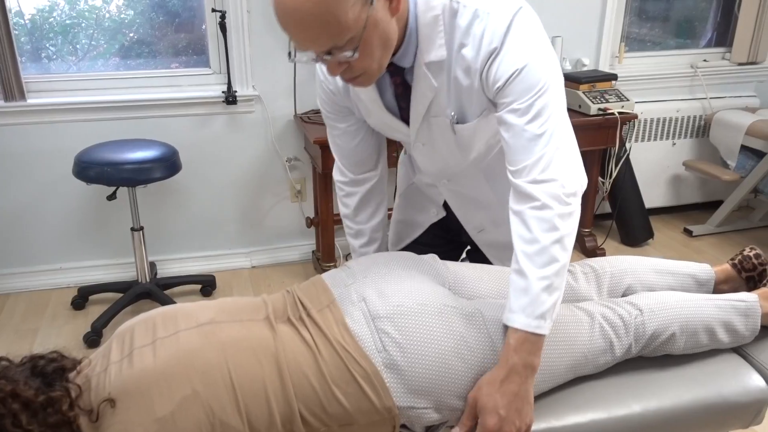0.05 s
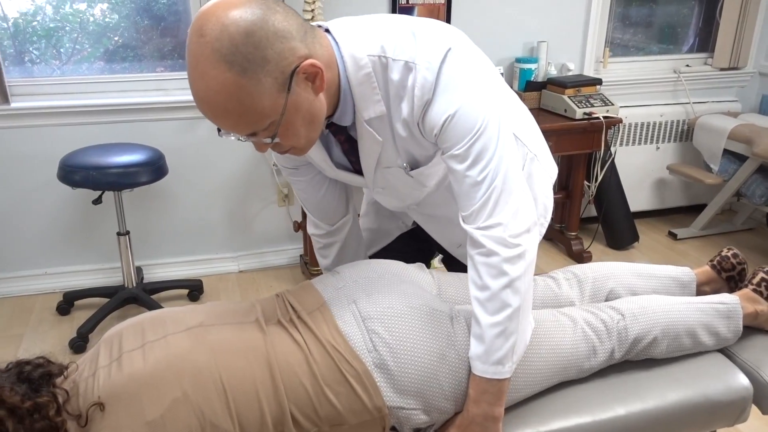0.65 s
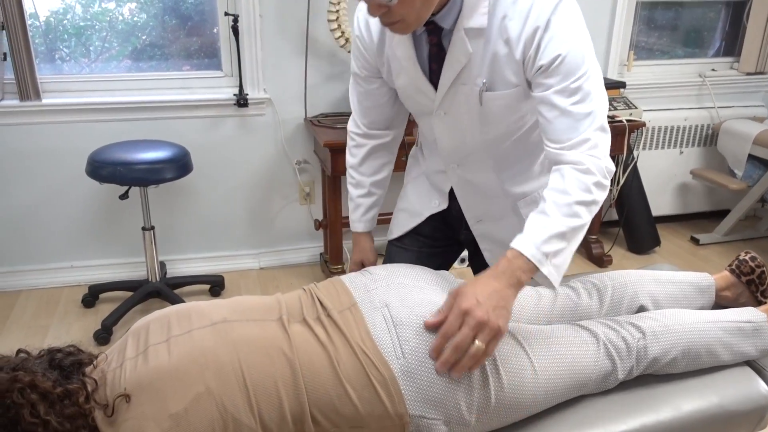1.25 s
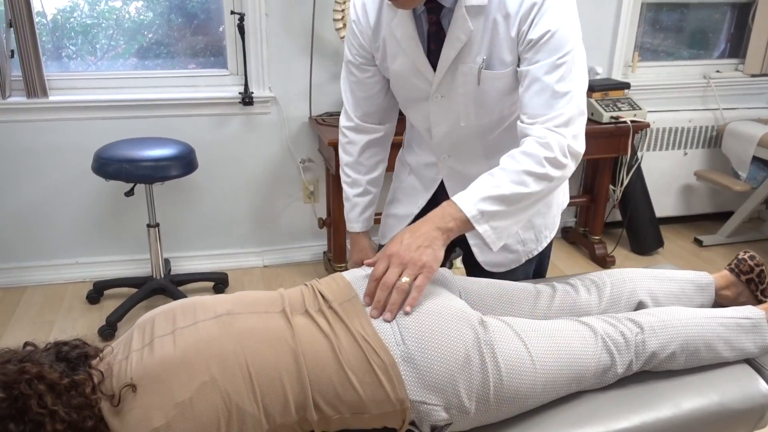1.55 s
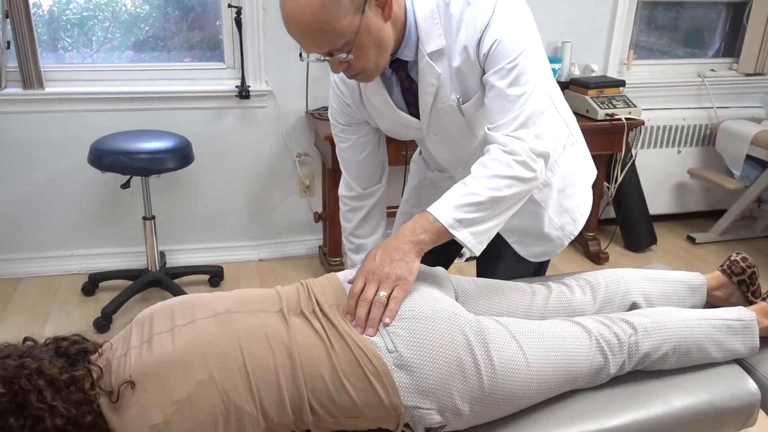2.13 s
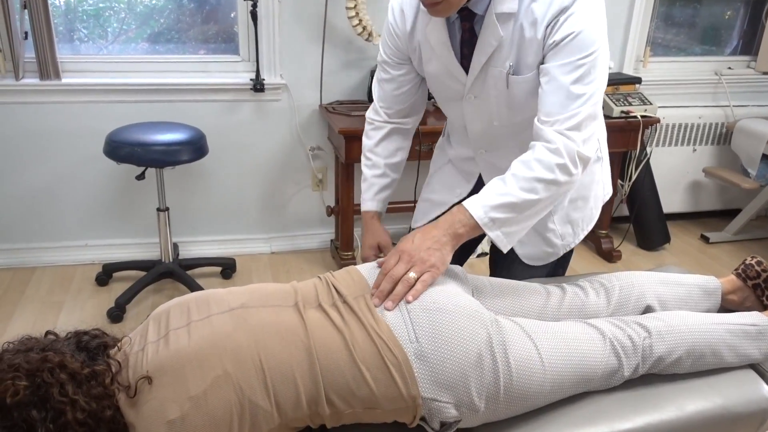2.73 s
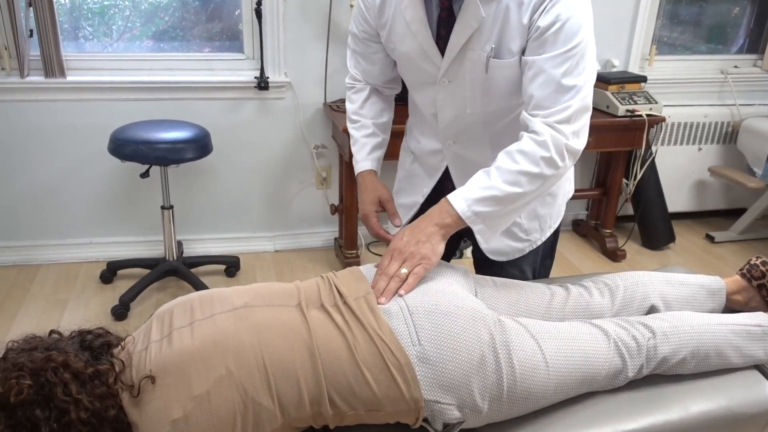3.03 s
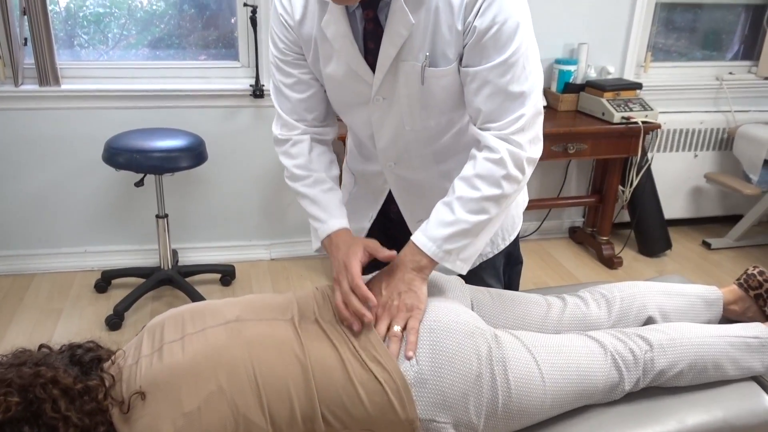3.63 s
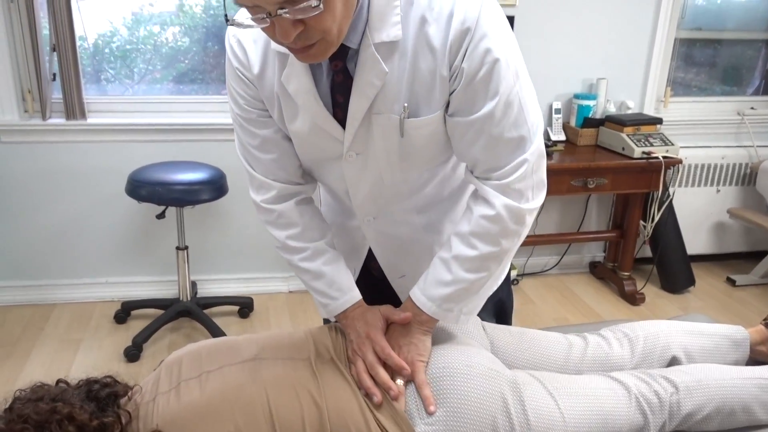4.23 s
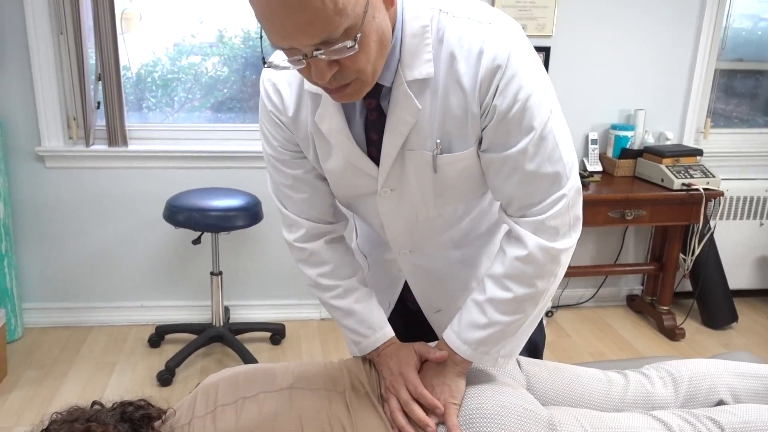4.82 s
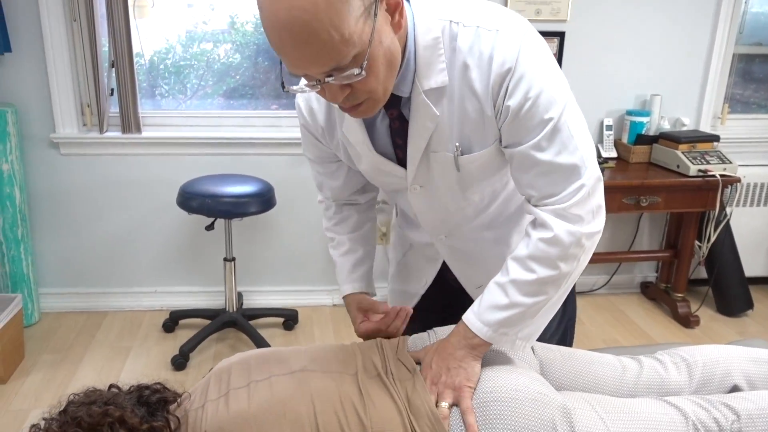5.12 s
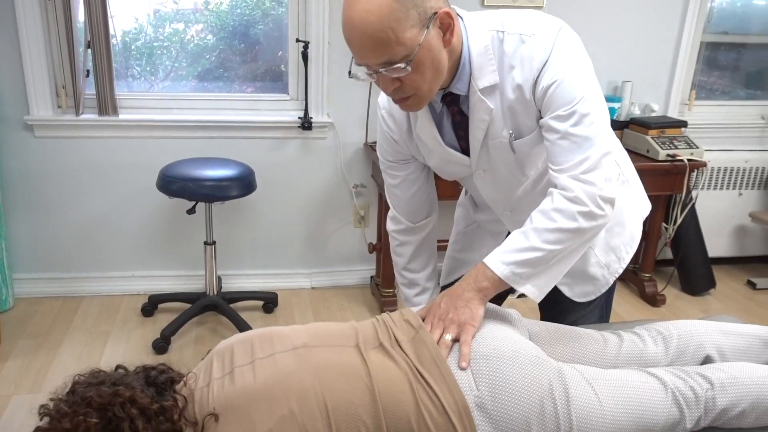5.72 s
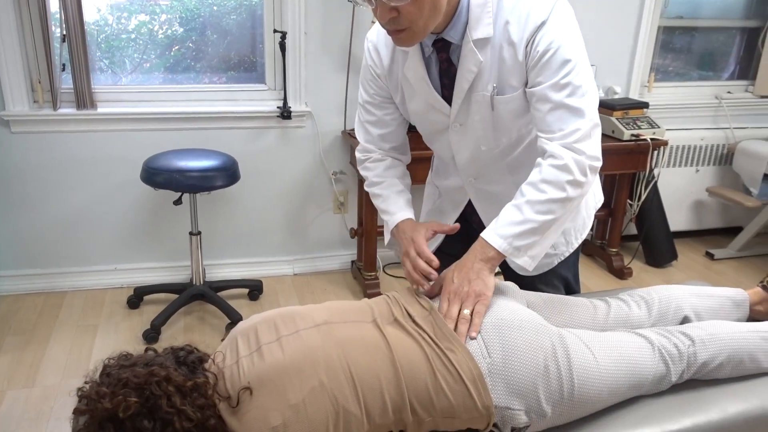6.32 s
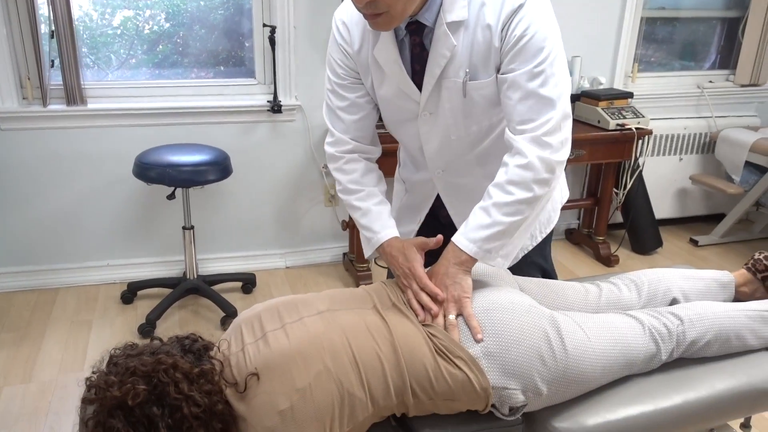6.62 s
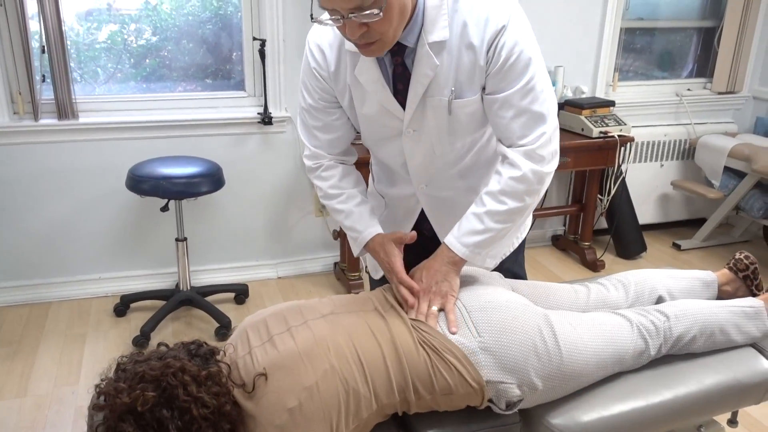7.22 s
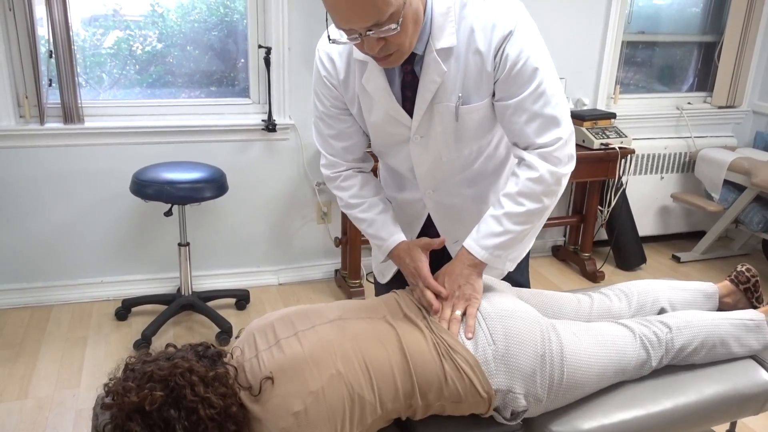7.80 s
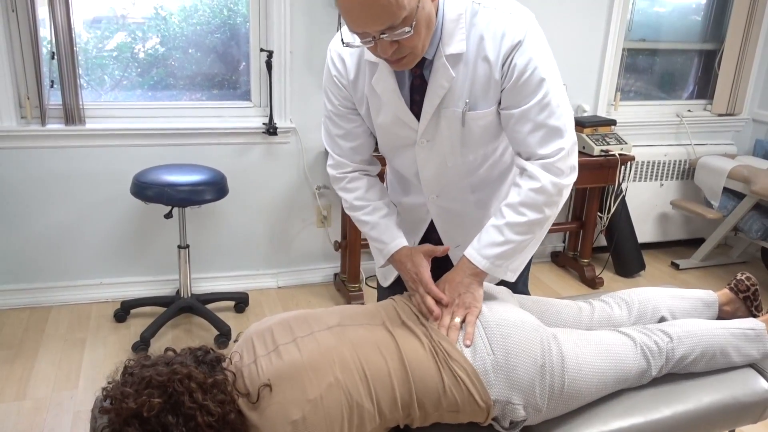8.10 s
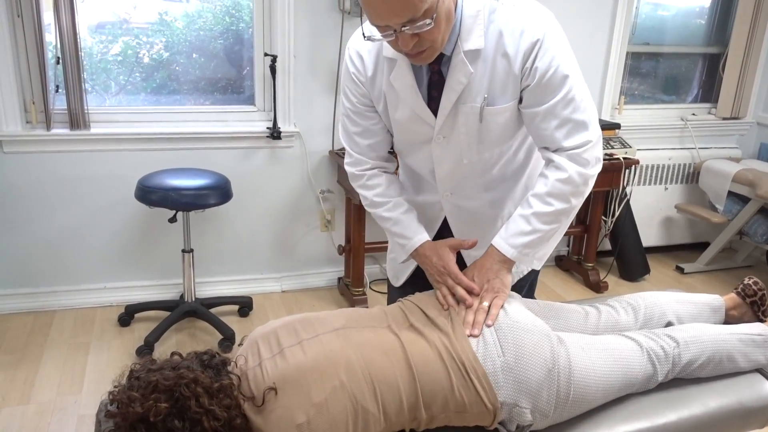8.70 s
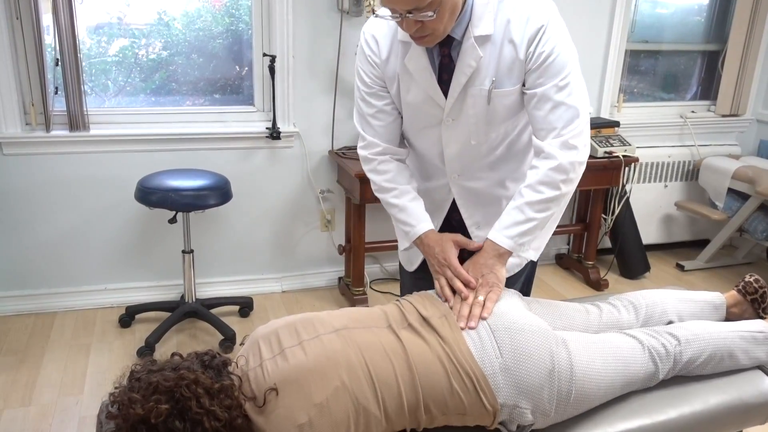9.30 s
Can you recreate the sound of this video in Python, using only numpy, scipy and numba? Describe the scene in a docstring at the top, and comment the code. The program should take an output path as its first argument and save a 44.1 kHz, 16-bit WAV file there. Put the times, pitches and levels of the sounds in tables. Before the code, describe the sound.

Faint ventilation hums throughout in a small, hard-walled room, with soft rustling of hands and sleeves on clothes. A padded treatment table creaks at 0.4 seconds, and its steel latches clank at about 0.7, 1.0 and 1.5 seconds. A motor whines quietly from 1.6 to 2.3 seconds, ending with a sharp knock and a short, high squeak. From 2.8 to 3.3 seconds a section is ratcheted up in six quickening, fading clicks. At 4.6 seconds it is thrust down with a loud, rattling clunk. The frame knocks around 5.7 seconds, a second ratchet run follows from 6.0 to 6.5, and another heavy drop lands at 6.9. After that, only faint cloth rubbing and the hum remain until the end, past 9 seconds. The blows sound slightly distant and flattened, with short room reflections.

```python
"""A small, hard-walled room where a padded treatment table is worked. Steel latches clank, a geared
motor runs briefly, dry joints creak and squeak as they stick and slip. Twice the drop section is
ratcheted up, then thrust down onto its stop. Clothes rustle over a low ventilation hum.
The microphones hear mostly reflections, and a limiter flattens every loud blow."""
import sys
import numpy as np
from scipy import signal
from scipy.fft import rfft, irfft
from scipy.io import wavfile
from scipy.ndimage import uniform_filter1d
from numba import njit

SR = 44100
rng = np.random.default_rng(int(sys.argv[2]) if len(sys.argv) > 2 else 0)


def to_wav(s):
    """Save 16-bit WAV."""
    ch = np.atleast_2d(s).T  # columns
    pcm = np.round(np.clip(ch, -1, 1) * 32767)  # PCM
    wavfile.write(sys.argv[1], SR, pcm.astype(np.int16))


N = 412335
T = np.arange(N) / SR
BLOW_T = T[:SR // 2]


def amp(db):
    """Decibels to gain."""
    return 10 ** (np.asarray(db) / 20)


def unit(x):
    """Scale to rms 1."""
    return x / np.sqrt(np.mean(x ** 2))


def along(points, hz):
    """Read (Hz, value) points on a log-frequency axis."""
    knots_hz, values = np.transpose(points)
    return np.interp(np.log(hz + 1), np.log(knots_hz), values)


def colour(x, points):
    """Filter by a (Hz, dB) spectrum."""
    return irfft(rfft(x) * amp(along(points, np.fft.rfftfreq(len(x), 1 / SR))), len(x))


def noise(size):
    """Flat-spectrum noise, rms 1."""
    return unit(irfft(np.exp(2j * np.pi * rng.random(size // 2 + 1)), size))


def narrow(hz, width_hz):
    """Noise in one steep resonance."""
    offset = (np.fft.rfftfreq(N, 1 / SR) - hz) / width_hz
    return unit(irfft(rfft(noise(N)) / (1 + (2 * offset) ** 2), N))


def walk(rate_hz):
    """Smooth random drift, rms 1."""
    return narrow(0, rate_hz)


def fade(t, t60_s):
    """Exponential decay."""
    return np.exp(-np.log(1000) * t / np.maximum(t60_s, .002))


def arch(middle_s, width_s):
    """Smooth rise and fall; width at half height."""
    return np.cos(np.pi / 2 * np.clip((T - middle_s) / width_s, -1, 1)) ** 2


def ramp(t, length_s):
    """Linear rise from 0 to 1."""
    return np.clip(t / length_s, 0, 1)


def sized(x, db):
    """Give a blow the energy of 25 ms at this level."""
    return x * amp(db) * np.sqrt(.025 * SR / np.sum(x ** 2))


def add(track, at_s, x):
    """Mix a sound in at a time."""
    start = int(at_s * SR)
    track[..., start:start + x.shape[-1]] += x[..., :N - start]


def mic_pair(mid, side):
    """Two close microphones: alike in the bass, unrelated in the treble."""
    # (frequency [Hz], side minus mid [dB])
    side_spectrum = [(60, -43), (125, -40), (250, -22.5), (500, -15.5), (1000, -7), (2000, -4.5),
                     (4000, -0.5), (12000, 0.5)]
    return mid + np.array([[1], [-1]]) * colour(side, side_spectrum)


def reflections():
    """Dense wall reflections; each band dies at its own rate."""
    # room decay: (frequency [Hz], t60 [s])
    decay = [(60, 0.63), (250, 0.39), (800, 0.3), (5000, 0.31), (14000, 0.24)]
    centres_hz, t60s_s = np.transpose(decay)
    size = len(BLOW_T)
    white, hz = rfft(noise(size)), np.fft.rfftfreq(size, 1 / SR)
    tail = np.zeros(size)
    for share, t60_s in zip(np.eye(len(centres_hz)), t60s_s):
        band = irfft(white * along(np.c_[centres_hz, share], hz), size)
        tail += band * fade(BLOW_T, t60_s)
    tail *= 1 - fade(BLOW_T, 0.0092)  # first walls answer after a few ms
    return tail / np.sqrt(np.sum(tail ** 2))


def room(x, direct_db):
    """Direct path followed by the reflections."""
    response = mic_pair(reflections(), reflections())
    response[:, 0] += amp(direct_db)
    return signal.fftconvolve(x[None], response, axes=1)[:, :N] / np.sqrt(1 + amp(direct_db) ** 2)


def ventilation():
    """Steady air noise, a duct hum and a building rumble that swells late."""
    # air noise: (frequency [Hz], density [dB])
    air_spectrum = [(20, -3), (55, 2.5), (95, -7), (130, -4), (175, -9), (240, -7.5), (330, -7),
                    (650, -17.5), (900, -17.5), (1500, -25), (5000, -34.5), (15000, -39)]
    mid, side = (unit(colour(noise(N), air_spectrum)) for _ in range(2))
    hum = amp(-55) * narrow(hz=241.8, width_hz=10.3)
    swell = amp(-45) * arch(middle_s=8.67, width_s=0.9)
    rumble = (amp(-55.5) + swell) * narrow(hz=65.2, width_hz=3.6)
    return amp(-50) * mic_pair(mid, side) + hum + rumble


def cloth(settled_s=7.4):
    """Sleeves and hands slide over clothes in small uneven slips."""
    # hand strokes: (middle [s], width [s], level [dB])
    strokes = [(.01, 0.082, -41), (0.233, 0.44, -51), (1.273, 0.23, -54), (1.83, 0.12, -52.5),
               (3.668, 0.29, -51), (4.152, 0.046, -46), (4.202, 0.0088, -34), (4.569, 0.065, -36),
               (5.24, 0.32, -54), (5.483, .15, -56), (5.89, 0.23, -51), (6.73, 0.22, -53.5),
               (7.772, 0.12, -63.5), (8.276, .16, -56.5), (8.818, 0.11, -57), (9.215, 0.3, -58.5)]
    # cloth friction: (frequency [Hz], density [dB])
    rub_spectrum = [(100, -3.5), (400, 6), (1000, -6.5), (2400, -2.5), (5000, -9), (15000, -13.5)]
    effort = amp(-59.5) * ramp(settled_s - T, 0.11)  # soft shifting until the hands rest
    for middle_s, width_s, db in strokes:
        effort = np.maximum(effort, amp(db) * arch(middle_s, width_s))
    slips = noise(N) * amp(2.2 * walk(126))
    rub = unit(colour(slips, rub_spectrum))
    dull = signal.sosfilt(signal.butter(1, 4000, fs=SR, output="sos"), rub)
    treble_gain = amp(-57) * (effort / amp(-56)) ** 0.72  # firm rubs are duller
    return dull * effort + (rub - dull) * treble_gain


def motor(on_s=1.62, off_s=2.31, fade_s=.11, start_hz=303, run_hz=343, spin_up_s=0.14):
    """A geared motor whines up to speed over a soft whirr."""
    # whine: (frequency ratio, level [dB])
    partials = [(.75, -1), (1, -10), (1.2, -7), (2, -1.5), (3, -12.5), (4, -19), (6, -20.5)]
    running_s = np.maximum(T - on_s, 0)
    hz = run_hz + (start_hz - run_hz) * np.exp(-running_s / spin_up_s)
    phase = 2 * np.pi * np.cumsum(hz * (1 + 0.003 * walk(27))) / SR
    whine = sum(amp(db + 2 * walk(12)) * np.sin(ratio * phase) for ratio, db in partials)
    whirr = unit(colour(noise(N), [(100, 7), (400, 2), (1200, -3.5), (3000, -15.5), (12000, -59)]))
    envelope = amp(-44) * ramp(running_s, fade_s) * ramp(off_s - T, fade_s)
    return (unit(whine) + amp(-2.5) * whirr) * envelope


def stick_slip(slip, roughness, hiss):
    """A dry joint sticks and slips: a rough tone that swells, glides with sliding speed and dies."""
    start_s, length_s, first_hz, last_hz, db, overtones_db = slip
    progress = ramp(T - start_s, length_s)
    hz = first_hz + (last_hz - first_hz) * progress
    phase = 2 * np.pi * np.cumsum(hz * (1 + roughness * walk(943))) / SR
    overtones = 0.42 * np.sin(2 * phase) + 0.13 * np.sin(3 * phase) + 0.59 * np.sin(4 * phase)
    tone = (np.sin(phase) + amp(overtones_db) * overtones) / np.sqrt(1 + amp(overtones_db) ** 2)
    return (tone + hiss * noise(N)) * amp(db) * np.sin(np.pi * progress) ** 2


def creaks():
    """Low slips of a dry joint."""
    # (start [s], length [s], first pitch [Hz], last pitch [Hz], level [dB], overtones [dB])
    slips = [(0.367, 0.049, 333, 344, -35, 6), (.382, 0.068, 329, 307, -27.5, -15),
             (0.419, .085, 292, 268, -30.5, -19)]
    return sum(stick_slip(slip, roughness=0.025, hiss=.01) for slip in slips)


def squeaks():
    """High, hissy slips of a dry joint."""
    # (start [s], length [s], first pitch [Hz], last pitch [Hz], level [dB], overtones [dB])
    slips = [(2.384, .042, 5260, 3950, -20, 4), (2.403, 0.033, 3370, 3290, -23.5, 6),
             (2.42, .04, 4400, 5320, -25, 4), (2.422, 0.062, 3330, 3336, -16, 33)]
    return sum(stick_slip(slip, roughness=.03, hiss=.17) for slip in slips)


def ring(modes):
    """Struck modes, slightly different at every blow."""
    out = 0
    for hz, db, t60_s in modes:
        gain = amp(db + rng.normal()) * rng.choice([-1, 1])
        detuned_hz = hz * (1 + 0.0073 * rng.normal())
        out += gain * fade(BLOW_T, t60_s) * np.sin(2 * np.pi * detuned_hz * BLOW_T)
    return out


def sway():
    """The loaded table rocks on its base."""
    # (frequency [Hz], level [dB], t60 [s])
    modes = [(44.4, 3, 0.35), (49.2, -12.5, 1.6), (111, -24, 0.41)]
    out = np.zeros(N)
    add(out, 1.598, sized(ring(modes), db=-19.5))
    return out


def click():
    """One small dry click close by."""
    snap = colour(noise(len(BLOW_T)), [(4000, 5), (9000, -12)])
    out = np.zeros(N)
    add(out, .4155, sized(snap * fade(BLOW_T, 0.015), db=-36))
    return out


def fittings():
    """A spring pings as a latch lets go, a lever rings as its latch catches, the motor pedal rings."""
    # modes of each part: (frequency [Hz], level [dB], t60 [s])
    spring = [(10250, -16.5, 0.4), (11110, 6, 0.086), (12300, -11, .16), (14390, -15, .18),
              (14810, -20, .09)]
    lever = [(1717, 1, 0.17), (1970, 0, .15), (2449, -1.5, 0.15), (2640, -3, 0.16), (2770, -5, .2)]
    pedal = [(793, -1, 0.11), (872, -1, .15), (1020, 0, 0.15), (1430, -5, 0.13)]
    out = np.zeros((2, N))
    for at_s, modes, db in [(0.668, spring, -27), (.972, lever, -21), (1.549, pedal, -23.5)]:
        add(out, at_s, room(sized(ring(modes), db), direct_db=-8))
    return out


def blows(hits, spectrum, modes, crack, contact_s, direct_db):
    """Each blow is a crack, a short rattle of loose parts and the ring of the struck piece."""
    out = np.zeros((2, N))
    onset = 1 - np.exp(-BLOW_T / contact_s)
    for at_s, db, bass_db, treble_db, rattle_t60_s, ring_db in hits:
        tilt = [(150, bass_db), (600, 0), (1500, 0), (6000, treble_db)]
        force = (fade(BLOW_T, rattle_t60_s) + crack * fade(BLOW_T, 0.0071)) * onset
        for _ in range(2):  # two independent rattles and reflections sum dense and even, not hollow
            rattle = colour(colour(noise(len(BLOW_T)), spectrum), tilt) * force
            blow = sized(rattle, db) + sized(ring(modes), db + ring_db)
            add(out, at_s, room(blow, direct_db) / np.sqrt(2))
    return out


def frame(ring_db=-11.5):
    """The frame knocks against its padded stops."""
    # (time [s], level [dB], bass [dB], treble [dB], rattle t60 [s])
    knocks = [(2.2247, -14, -6.5, -2.5, 0.034), (2.268, -25.5, -20, 12.5, 0.026), (2.445, -28, 4, 17, 0.18),
              (2.675, -34, -5, 1, .3), (5.305, -48, 9, -6, .08), (5.35, -34.5, 10.5, 11.5, 0.094),
              (5.664, -17, -10, -2, 0.046), (5.675, -16.5, -5.5, 6.5, 0.072), (5.802, -32, 14, 12, 0.075)]
    # frame rattle: (frequency [Hz], density [dB])
    spectrum = [(30, -35), (110, 1), (230, -5), (370, 10.5), (700, -5), (1300, 0), (1900, -11),
                (2900, -12.5), (5000, -30.5), (14000, -48)]
    # frame ring: (frequency [Hz], level [dB], t60 [s])
    modes = [(276, -1.5, 0.21), (323, -0.5, 0.25), (387, 11, 0.12), (1330, -23, .12)]
    hits = [(*knock, ring_db) for knock in knocks]
    return blows(hits, spectrum, modes, crack=0.33, contact_s=0.00077, direct_db=-6)


def ratchet_hits(teeth=6):
    """The section speeds up as it lifts: each tooth comes sooner, lighter and thinner."""
    # (start [s], first tooth gap [s], level [dB], treble [dB])
    lifts = [(2.750, .149, -13, -2.5), (6.049, .1438, -13, -4.5)]
    for at_s, gap_s, lift_db, lift_treble_db in lifts:
        for tooth in range(teeth):
            pull = np.sin(np.pi * tooth / (teeth - 1))  # firmest and brightest halfway up
            db = lift_db - tooth + 0.9 * pull
            bass_db, treble_db = 3.5 - 1.85 * tooth, lift_treble_db + 3.5 * pull
            rattle_t60_s, ring_db = 0.093 * 0.81 ** tooth, -10.5 + 1.36 * tooth
            yield at_s, db, bass_db, treble_db, rattle_t60_s, ring_db
            at_s += gap_s
            gap_s = .83 * gap_s - .0102


def latches_and_ratchet(latch_ring_db=-19):
    """Steel latches and ratchet teeth clank."""
    # (time [s], level [dB], bass [dB], treble [dB], rattle t60 [s])
    latches = [(.376, -35.5, -16, 1.5, 0.25), (.651, -31.5, 14, -7, 0.06), (.663, -17.5, 4, -3.5, 0.062),
               (.934, -14, 1, -5, 0.18), (.972, -15, -14, -9, 0.12), (1.546, -19, -6, 3.5, 0.16),
               (1.596, -24.5, 4.5, -1, .14), (5.573, -23.5, -15, -9, 0.028), (5.783, -32.5, 4, 0.5, 0.043),
               (6.816, -44, -5, 5, 0.059), (6.872, -31, 9, -6, 0.04)]
    # steel rattle: (frequency [Hz], density [dB])
    spectrum = [(25, -22), (48, -2), (75, -11), (115, -1.5), (200, -2.5), (600, -0.5), (1200, -3),
                (2000, -6), (3000, -8), (5500, -14.5), (9000, -19.5), (15000, -26.5)]
    # steel ring: (frequency [Hz], level [dB], t60 [s])
    modes = [(658.3, 1, 0.076), (1163, 2.5, 0.066), (1603, -6, 0.12), (2420, -9, .12), (2804, -4, 0.093),
             (3860, -1, 0.036)]
    hits = [(*latch, latch_ring_db) for latch in latches] + list(ratchet_hits())
    return blows(hits, spectrum, modes, crack=0.56, contact_s=0.0033, direct_db=-7)


def drop_section(treble_db=1.7, rattle_t60_s=0.3):
    """Thrust onto its stop, the loaded section lands with a long rattle and rebounds once."""
    # (time [s], level [dB], bass [dB], ring [dB])
    thrusts = [(4.585, -13, -0.5, 3), (6.885, -10.5, 1.5, -5.5)]
    # section rattle: (frequency [Hz], density [dB])
    spectrum = [(25, -36), (48, -16), (80, -11), (125, -3), (210, -3), (320, -1.5), (480, -4), (800, -10.5),
                (1500, -13), (3000, -16.5), (7000, -29), (15000, -34.5)]
    # section ring: (frequency [Hz], level [dB], t60 [s])
    modes = [(113, -15, 0.23), (163.2, -18, 0.4), (268, -2, 0.19), (347, -6.5, 0.24)]
    rebound_s, rebound_db, rebound_t60_s, rebound_ring_db = .063, -4, 0.065, -9
    hits = []
    for at_s, db, bass_db, ring_db in thrusts:
        hits += [(at_s, db, bass_db, treble_db, rattle_t60_s, ring_db),
                 (at_s + rebound_s, db + rebound_db, bass_db, treble_db, rebound_t60_s, rebound_ring_db)]
    return blows(hits, spectrum, modes, crack=1.4, contact_s=0.0006, direct_db=-2.5)


def scene():
    """Everything that sounds in the room, in stereo."""
    friction = room(squeaks() + cloth(), direct_db=-4.5) + room(creaks(), direct_db=3.5)
    impacts = latches_and_ratchet() + frame() + drop_section() + fittings() + click()
    return friction + impacts + motor() + sway() + ventilation()


def record(dry, limit_db=-14, attack_s=0.0037, release_s=0.0013, low_cut_hz=30, top_hz=16100):
    """The microphones lose the deepest bass, a fast limiter holds the blows down, the top is cut."""
    sound = signal.sosfilt(signal.butter(2, low_cut_hz, "high", fs=SR, output="sos"), dry)
    power = uniform_filter1d(np.mean(sound ** 2, axis=0), size=100)
    envelope = follow(power, 1 / (attack_s * SR), 1 / (release_s * SR))
    gain = (1 + (envelope / amp(limit_db) ** 2) ** 2) ** (-1 / 4)
    return signal.sosfilt(signal.ellip(10, .2, 80, top_hz, fs=SR, output="sos"), sound * gain)


@njit
def follow(power, attack, release):
    """Limiter envelope with separate rise and fall rates per sample."""
    out, level = np.empty(len(power)), 0.
    for i in range(len(power)):
        level += (power[i] - level) * (attack if power[i] > level else release)
        out[i] = level
    return out


dry = scene()
out = record(dry)
to_wav(out)
```